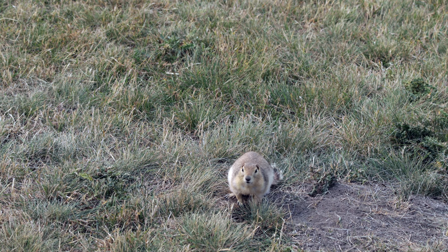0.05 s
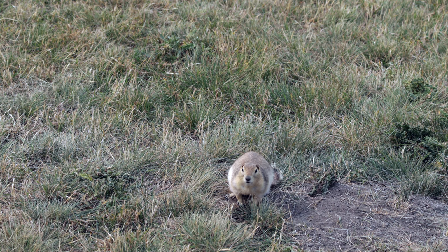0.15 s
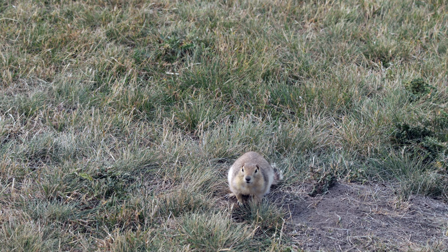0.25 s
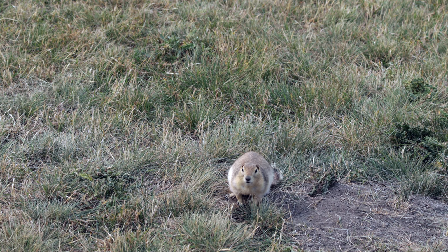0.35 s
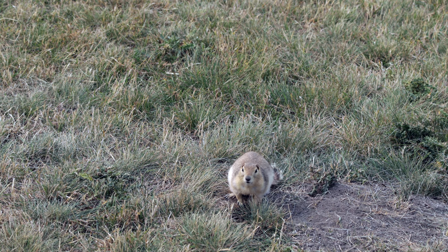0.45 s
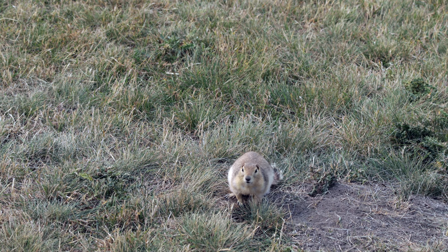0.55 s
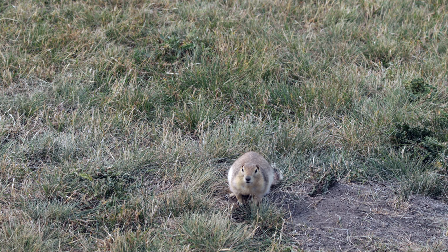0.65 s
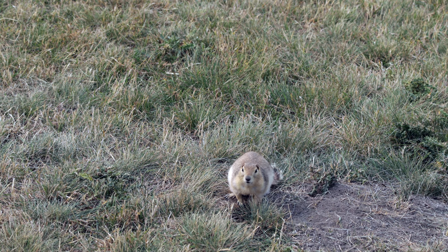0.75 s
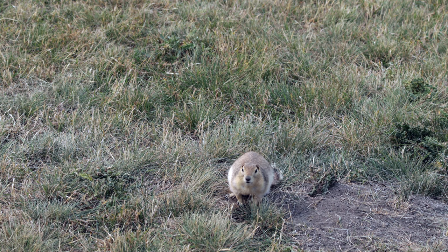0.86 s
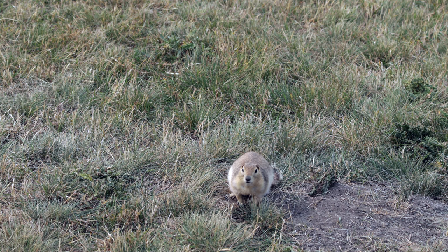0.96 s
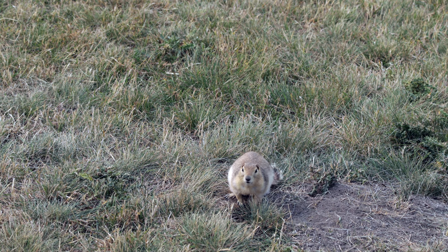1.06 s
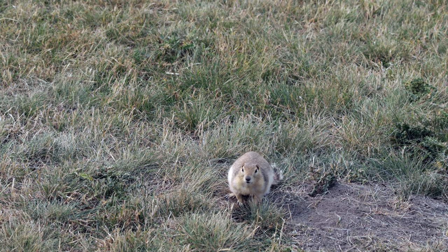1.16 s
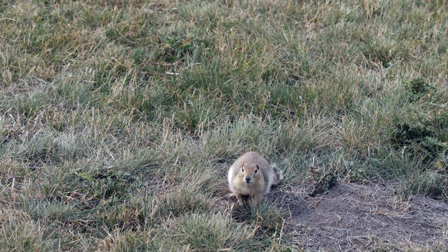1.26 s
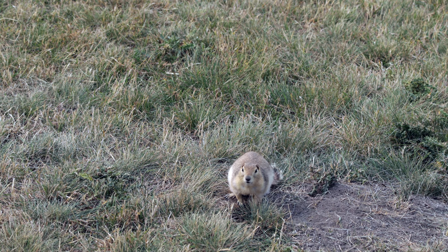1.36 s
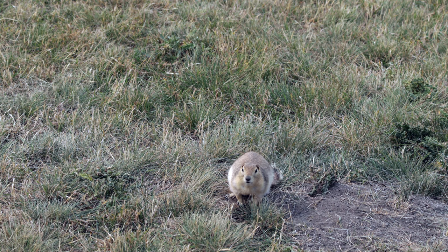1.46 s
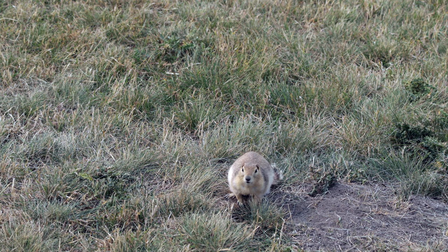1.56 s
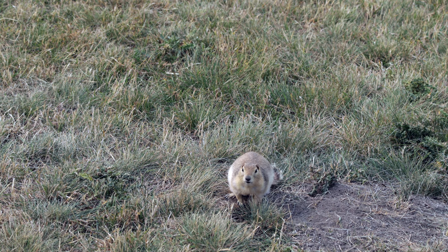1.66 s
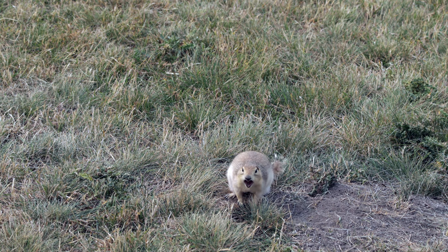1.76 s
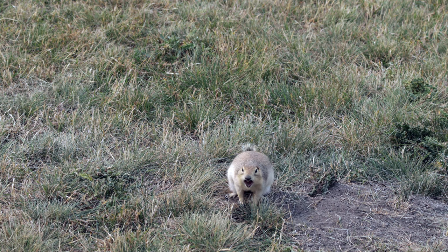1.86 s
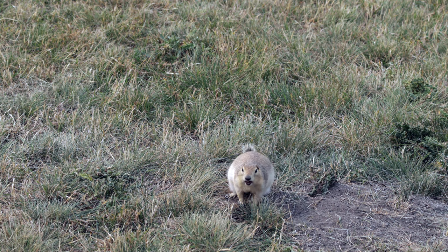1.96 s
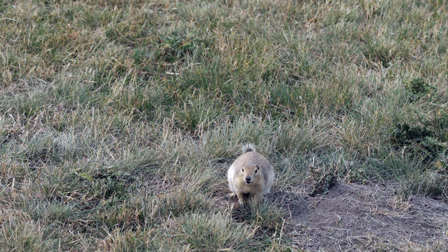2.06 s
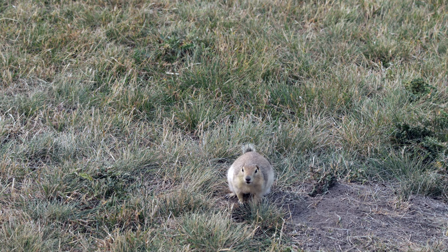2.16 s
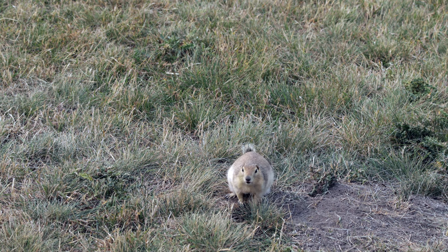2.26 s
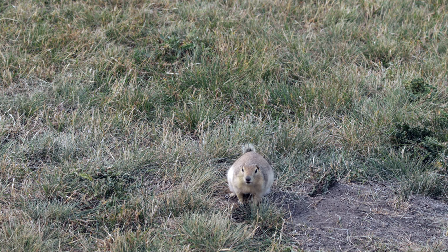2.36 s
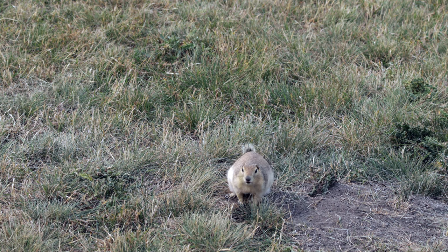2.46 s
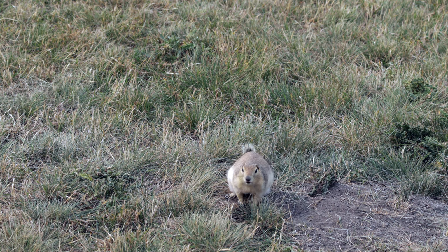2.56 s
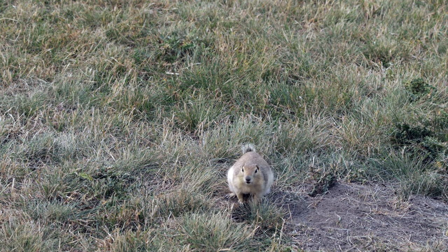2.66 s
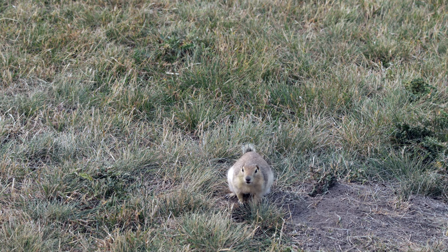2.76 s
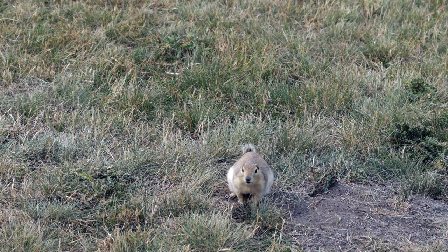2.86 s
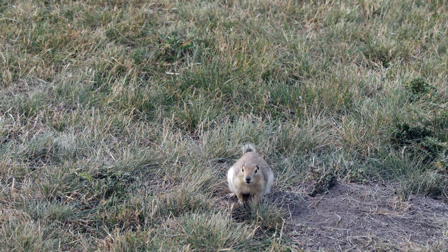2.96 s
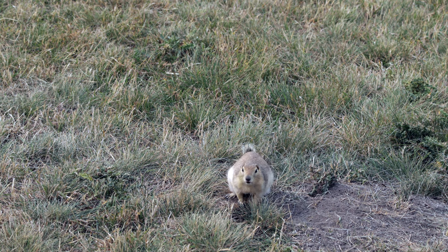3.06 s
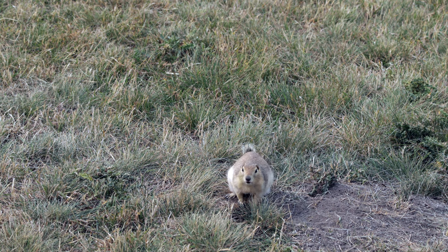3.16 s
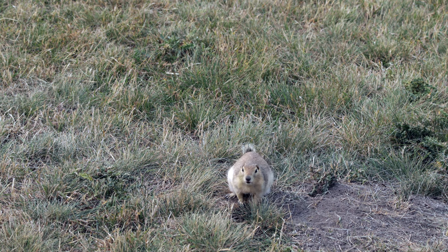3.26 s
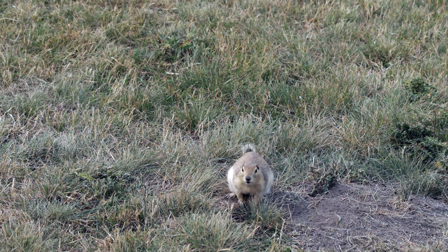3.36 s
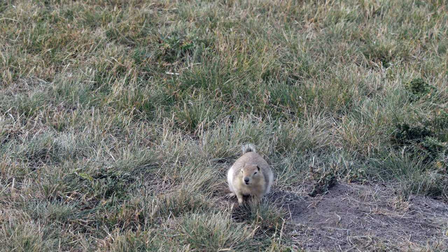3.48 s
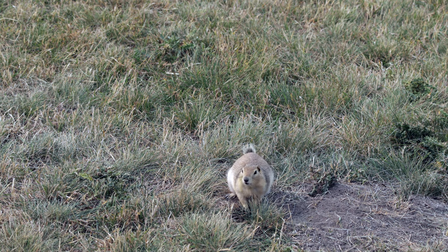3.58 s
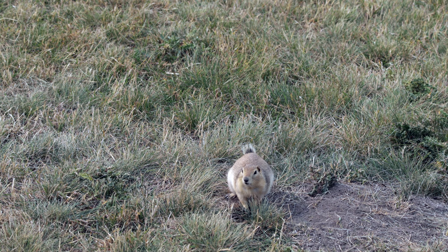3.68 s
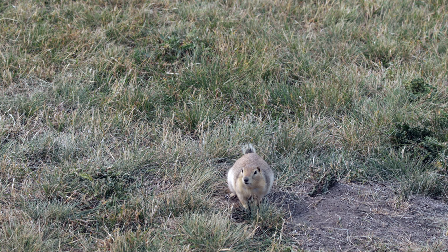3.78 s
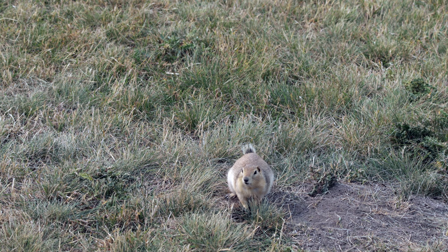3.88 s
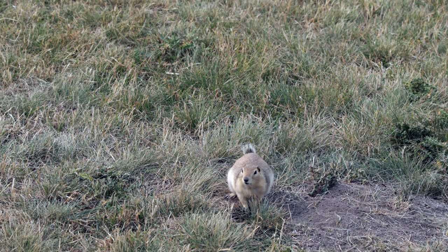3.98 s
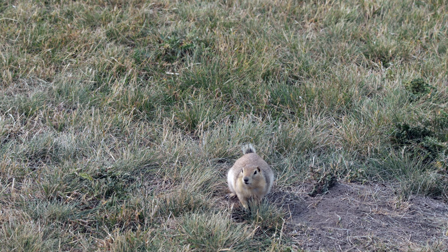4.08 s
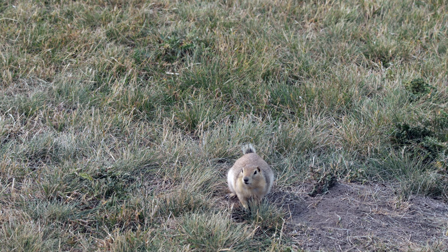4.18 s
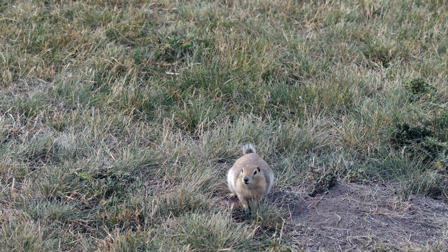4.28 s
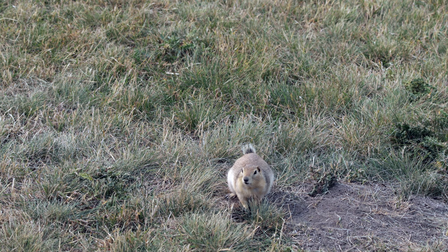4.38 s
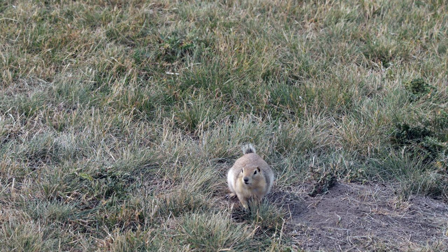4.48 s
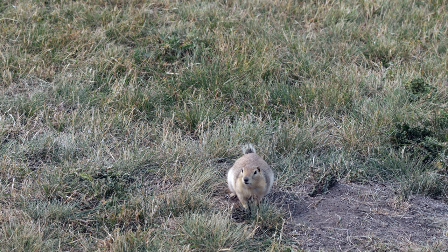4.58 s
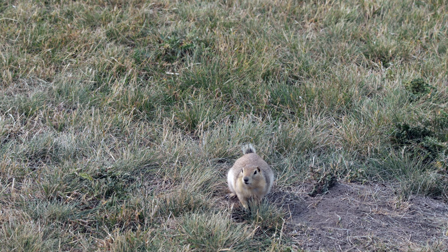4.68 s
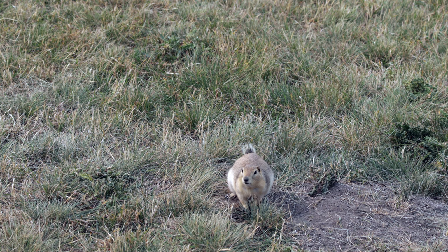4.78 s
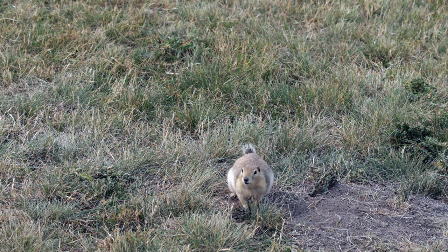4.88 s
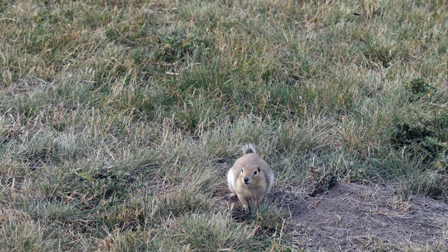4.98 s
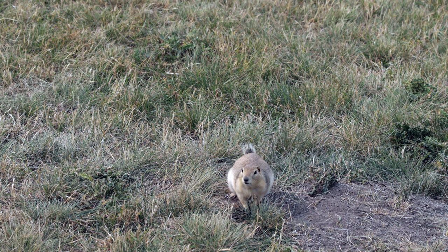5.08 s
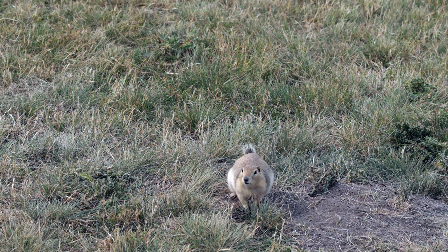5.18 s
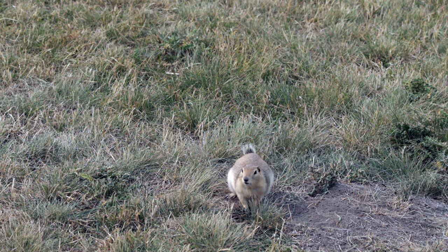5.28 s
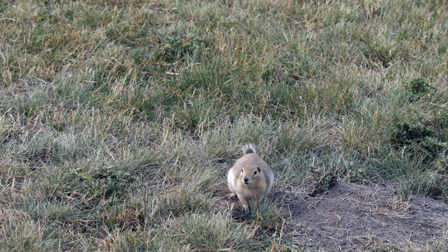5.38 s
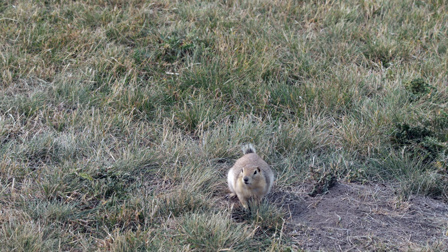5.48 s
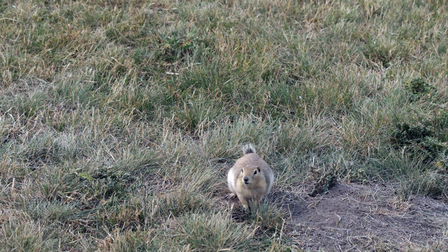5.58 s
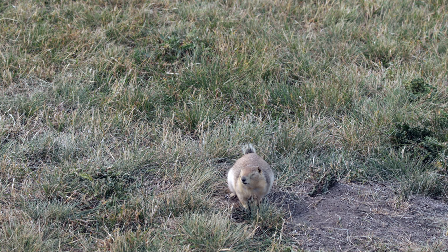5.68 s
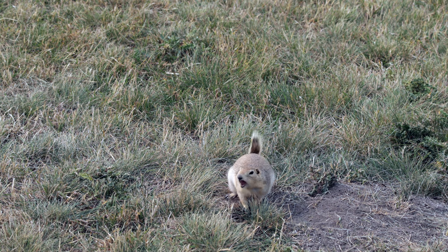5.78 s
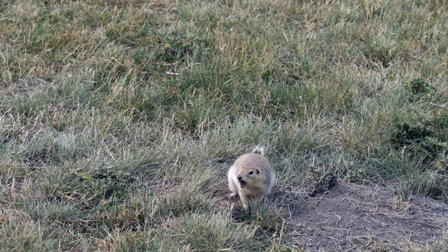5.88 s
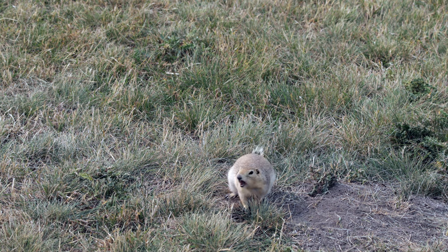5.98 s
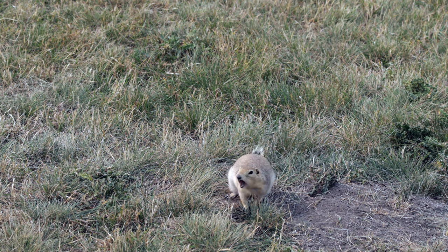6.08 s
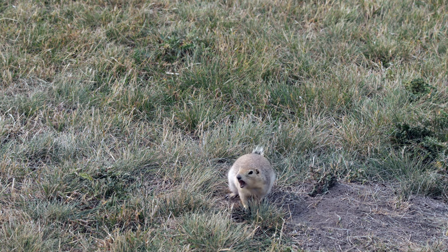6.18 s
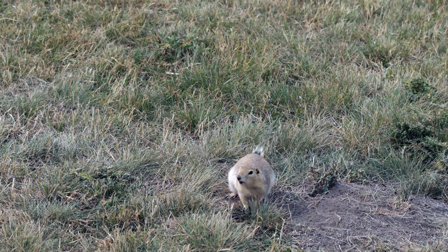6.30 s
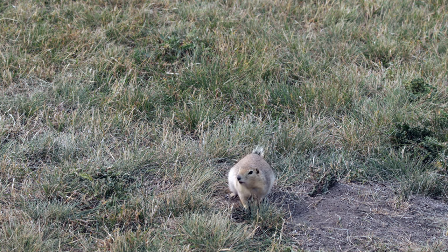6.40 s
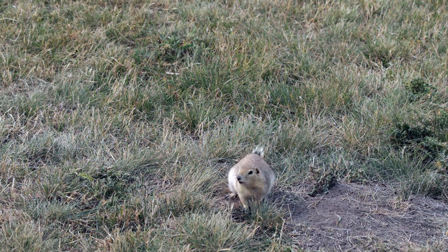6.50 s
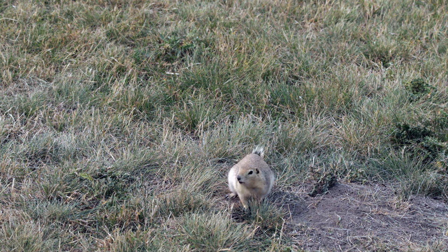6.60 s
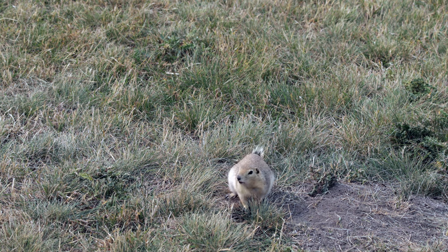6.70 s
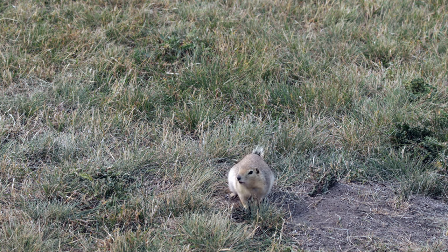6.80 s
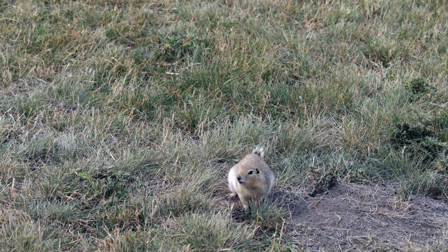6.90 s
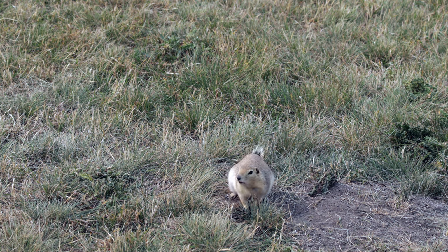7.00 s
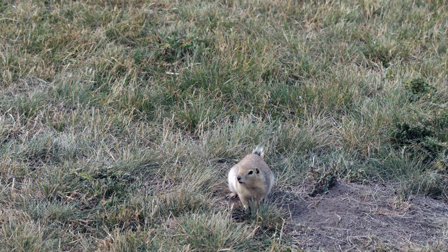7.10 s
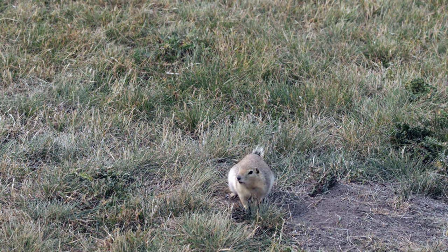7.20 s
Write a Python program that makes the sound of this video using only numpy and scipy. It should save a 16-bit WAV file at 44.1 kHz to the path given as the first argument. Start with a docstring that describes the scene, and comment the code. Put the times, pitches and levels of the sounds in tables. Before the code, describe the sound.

Steady distant traffic outdoors, faint bird chips and grass rustle, broken by two shrill, very short squirrel alarm whistles four seconds apart.

```python
"""A ground squirrel on a lawn gives two shrill alarm whistles, the second followed by a short soft note: each
is a sinking near-pure tone, and faint shaped noise surrounds it. A far bird chips in rising harmonic slurs and
fainter notes slide; a dull knock rings early on. Dry grass stirs as noise and ticks as damped snaps. Traffic
hums all along as coloured noise, with an engine drone near the end. The first whistle is so loud that a limiter
ducks the traffic for about half a second."""
import sys
import numpy as np
from scipy import signal
from scipy.fft import rfft, irfft
from scipy.io import wavfile
from scipy.ndimage import uniform_filter1d

SR = 44100
rng = np.random.default_rng(int(sys.argv[2]) if len(sys.argv) > 2 else 0)


def transcribe(signal):
    """Save signal, clipped to [-1, 1], as a 16-bit WAV file at the path in sys.argv[1]."""
    frames = np.atleast_2d(signal).T
    limited = np.clip(frames, -1, 1)
    pcm = np.round(limited * 32767).astype(np.int16)
    wavfile.write(sys.argv[1], SR, pcm)


N = 319504
TIME = np.arange(N) / SR

# Colour tables give relative density; levels are those before the limiter.
# traffic colour: pitch_hz, density_db_per_hz
TRAFFIC_COLOUR = [(15, -51), (25, -17), (39, -25), (54, -3), (106, -1), (157, -3.5), (233, -6), (311, -10),
                  (391, -14.5), (520, -14.5), (683, -11.5), (830, -9.5), (992, -10.5), (1530, -16.5),
                  (1700, -18), (2090, -24), (3500, -38.5), (4550, -60.5), (7700, -120)]
TRAFFIC_DB = -32.5
# A vehicle draws away at the start: its lift of the rumble, low and high tyre roar; time to half the lift
LEAVING_RUMBLE_DB, LEAVING_BODY_DB, LEAVING_ROAR_DB, LEAVING_S = 1, 7.0, 2.5, 1.4
# engine drone: time_s, main_line_rms_db
DRONE_LEVEL = [(5.8, -52.5), (6.05, -42.5), (6.44, -35), (6.6, -41.5), (7.24, -43)]
# lines of the engine drone: multiple_of_note, level_db
DRONE_LINES = [(1, 0), (1.2, -7)]
DRONE_HZ = 177
# faint hiss of the open air: pitch_hz, density_db_per_hz
HISS_COLOUR = [(1760, -28.5), (3000, -8.5), (3370, -12.5), (4390, -7), (5360, -9.5), (7010, -13),
               (8330, -16), (15600, -20.5)]
HISS_DB = -64
# colour of stirring grass: pitch_hz, density_db_per_hz
GRASS_COLOUR = [(1500, -19), (3000, 3), (4500, 1), (7000, -8.5), (9500, -19), (14500, -14), (16000, -25)]
# level of the rustling grass: time_s, rms_db
GRASS_LEVEL = [(0, -57), (.47, -55), (1, -60), (2.6, -62.5), (4.1, -64.5), (4.8, -73.5), (5.6, -77),
               (5.8, -59.5), (6.6, -62), (7.24, -67)]
# snaps of dry stems: start_s, envelope_peak_db, pitch_hz
STEM_SNAPS = [(1.204, -46, 11500), (1.2145, -51, 12000), (3.4625, -29, 5400), (5.796, -51, 9500)]
# a dull far knock: start_s, level_db
KNOCK_EVENT = (0.258, -22)
# what rings in the knock: pitch_hz, level_db, t60_s
KNOCK_MODES = [(993, 4.5, 0.028), (794, 0.5, 0.042), (292, -13, 0.11)]
# a low double peep and a thin squeak: start_s, length_s, first_pitch_hz, last_pitch_hz, level_db
FAR_CALLS = [(3.684, 0.019, 1720, 1680, -36), (3.708, .034, 1650, 1610, -40.5),
             (6.731, .042, 7250, 8020, -49), (6.765, .03, 8100, 6000, -61)]
# chips of a far bird: loudest_s, level_db, pitch_factor, brightness_db
CHIPS = [(2.345, -41, 1.02, -5), (2.535, -47, 1, -2), (4.148, -42, 1.01, -3), (4.345, -42, 1, -3.5),
         (4.558, -40, 1, -5), (5.797, -41, 1, -3), (5.99, -44, .99, -8), (6.212, -41.5, 1, -6),
         (6.46, -44.5, .96, -5), (6.648, -44, .97, -3), (6.697, -48, .98, -6), (6.855, -49, .97, 0)]
# resonances of the bird's throat: pitch_hz, level_db
BIRD_THROAT = [(1900, -27), (2600, 0.5), (3050, -0.5), (3600, -19.5), (4200, -12.5), (4800, -4), (5400, -6),
               (6100, -31)]
# A chip holds a low fundamental through a soft lead-in, then slurs upward through its loud part
CHIP_HZ, SLUR_HZ_PER_S, SLUR_LEAD_S = 659, 4880, 0.01303
CHIP_WIDTH_S, LEAD_IN_S, LEAD_IN_DB = .013, .038, -8.5
# the squirrel's whistles: start_s, length_s, level_db, attack_s, release_s, held_pitch_hz,
# starts_higher_by_hz, settling_time_s, quiver_depth_hz, noise_peak_rms_db
WHISTLES = [(1.8244, .142, 0.4, .021, 0.05, 8297, 800, .021, 45, -51.5),
            (5.8568, 0.12, -6, 0.032, 0.048, 8360, 623, .025, 7, -55),
            (6.152, 0.041, -16.6, .011, 0.039, 8540, 30, .008, 0, -53.5)]
QUIVER_HZ = 31.5
# colour of the noise around the whistles: pitch_hz, density_db_per_hz
NOISE_COLOUR = [(2600, -21), (4000, 6), (5400, -2), (7000, -8.5), (8000, -8), (8600, 4.5), (9400, -7),
                (12000, -19), (14300, -8.5), (15700, -15)]
# The noise around each whistle is longer than it by this margin at either end
NOISE_MARGIN_S = .028
# rasp as the short note dies: start_s, end_s, peak_rms_db
RASP_EVENT = (6.168, 6.188, -51)
# colour of that rasp: pitch_hz, density_db_per_hz
RASP_COLOUR = [(7000, -25), (9400, 3), (11000, -1), (12200, -5), (13200, -25)]
# A weak, rough undertone: pitch, level under a 0 dB whistle (softer whistles lose it faster), fading time
UNDERTONE_HZ, UNDERTONE_DB, UNDERTONE_S = 4000, -44, .045
# likeness of air noise at the two microphone ports: pitch_hz, coherence
COHERENT = [(30, .998), (80, .99), (170, .97), (320, .9), (650, .58), (1200, .46), (2400, .66), (4000, .5),
            (7000, .2), (15000, .2)]
# phase by which the left port leads: pitch_hz, lead_rad
LEFT_LEAD = [(60, 0), (340, 0.16), (600, -.5), (1120, -1.46), (2070, -2.5), (3700, -3.5), (5500, -0.8),
             (15000, -2)]
# left level over right level: pitch_hz, difference_db
LEFT_TILT = [(60, -0.5), (110, 0.0), (200, 0), (380, -0.5), (700, 0), (1290, -3.0), (2380, -2.5), (4400, 4),
             (8120, -2), (15000, 2)]
# upper edge of the sound's band
EDGE_HZ = 15780


def from_db(db):
    """Turns decibels into an amplitude factor."""
    return 10 ** (np.asarray(db) / 20)


def unit(x):
    """Scales to rms 1."""
    return x / np.sqrt(np.mean(x ** 2) + 1e-20)


def at_hz(points, hz):
    """Reads a spectrum table on a log-frequency axis."""
    f, value = np.transpose(points)
    return np.interp(np.log(hz + 1), np.log(f + 1), value)


def at_time(rows, t):
    """Reads every column of a curve table."""
    s, *columns = np.transpose(rows)
    return [np.interp(t, s, column) for column in columns]


def add(mix, s, sound):
    """Mixes a sound in at time s."""
    part = mix[max(round(s * SR), 0):][:len(sound)]
    part += sound[:len(part)]


def ramp(share):
    """Rises from 0 to 1 along a quarter sine, then holds."""
    return np.sin(np.pi / 2 * np.clip(share, 0, 1))


def waver(size, hz):
    """Smooth random motion of rms 1, mostly slower than hz."""
    f = np.fft.rfftfreq(size, 1 / SR)
    return unit(irfft(rfft(rng.standard_normal(size)) / (1 + (f / hz) ** 4), size))


def glide(hz, jitter, flutter_db):
    """A tone on a moving pitch, unsteady in pitch and level; complex, so that its phase can be shifted."""
    turns = np.cumsum(hz * (1 + jitter * waver(len(hz), 600))) / SR
    return from_db(flutter_db * waver(len(hz), 150)) * np.exp(2j * np.pi * turns)


def air_noise(spectrum, colour_db=lambda t, hz: 0):
    """Outdoor noise at both ports: alike in the bass, reaching the right port first higher up."""
    count = N // 512 + 5
    t, hz = np.arange(count)[:, None] * 512 / SR, np.fft.rfftfreq(2048, 1 / SR)
    a, b, c, d = rng.standard_normal((4, count, len(hz)))
    shared, separate = a + 1j * b, c + 1j * d
    same = np.clip(at_hz(COHERENT, hz), 0, 1)
    left = shared * np.exp(1j * at_hz(LEFT_LEAD, hz)) * from_db(at_hz(LEFT_TILT, hz))
    right = same * shared + np.sqrt(1 - same ** 2) * separate
    # the colour applies to the sum of both ports
    middle = np.sqrt(np.mean(abs(left + right) ** 2, axis=0))
    z = np.array([left, right]) / middle * from_db(at_hz(spectrum, hz) + colour_db(t, hz))
    x = signal.istft(z, nperseg=2048, noverlap=1536, time_axis=1, freq_axis=2)[1][:, :N]
    return x / x.mean(0).std()


def scatter(x, wet_db, t60):
    """The lawn and far things throw back a thin, quickly dying tail, different at each port."""
    t = np.arange(SR) / SR
    sparse = rng.standard_normal((2, SR)) * (rng.random((2, SR)) < 1 / 16)
    taps = sparse * (t > .006) * from_db(-60 * t / t60)
    taps /= np.linalg.norm(taps, axis=1, keepdims=True)
    return from_db(wet_db) * signal.fftconvolve(x[None], taps, axes=1)[:, :N]


def traffic(body_hz=340, body_octaves=0.57, roar_hz=520):
    """Steady engine rumble and tyre roar, lifted at first by one vehicle that draws away."""
    def swell_db(t, hz):
        """The vehicle's fading lift, shared between rumble, low roar and high roar."""
        near = 1 / (1 + (t / LEAVING_S) ** 3)
        high = hz ** 2 / (hz ** 2 + roar_hz ** 2)
        body = np.exp(-.5 * (np.log2((hz + 1) / body_hz) / body_octaves) ** 2)
        outside_db = (1 - high) * LEAVING_RUMBLE_DB + high * LEAVING_ROAR_DB
        return near * (body * LEAVING_BODY_DB + (1 - body) * outside_db)
    return from_db(TRAFFIC_DB) * air_noise(TRAFFIC_COLOUR, swell_db)


def engine():
    """Two neighbouring orders of one far engine rise out of the traffic, wavering in the moving air."""
    db = at_time(DRONE_LEVEL, TIME)[0]
    turns = np.cumsum(DRONE_HZ + 2 * waver(N, 8)) / SR
    lines = [from_db(db + line_db + waver(N, 6)) * np.sin(2 * np.pi * multiple * turns)
             for multiple, line_db in DRONE_LINES]
    return np.sqrt(2) * sum(lines)  # from rms to peak


def grass(snap_s=.00007):
    """An uneven noise rustle over the steady air hiss, and a few stems that snap as brief damped tones."""
    rustle_db = at_time(GRASS_LEVEL, TIME)[0] + 1.3 * waver(N, 25)
    rustle = from_db(rustle_db) * air_noise(GRASS_COLOUR)
    t, snaps = np.arange(0, .004, 1 / SR), np.zeros(N)
    envelope = (t / snap_s) * np.exp(1 - t / snap_s)
    for s, db, hz in STEM_SNAPS:
        add(snaps, s, from_db(db) * envelope * np.sin(2 * np.pi * hz * t))
    return rustle + snaps + from_db(HISS_DB) * air_noise(HISS_COLOUR)


def knock():
    """A short dull blow of three damped modes, half lost in its own echoes."""
    t, blow = np.arange(0, .2, 1 / SR), np.zeros(N)
    start, level_db = KNOCK_EVENT
    ring = sum(from_db(db - 60 * t / t60) * np.sin(2 * np.pi * hz * t) for hz, db, t60 in KNOCK_MODES)
    onset = 1 - np.exp(-t / 0.00045)
    add(blow, start, -from_db(level_db) * ring * onset)
    return blow + scatter(blow, wet_db=1, t60=0.24)


def far_calls():
    """Faint notes from across the lawn that swell, slide to their last pitch and fade, unsteady and echoing."""
    voice = np.zeros(N, complex)
    for start, length, first_hz, last_hz, db in FAR_CALLS:
        share = np.arange(0, length, 1 / SR) / length
        tone = glide(first_hz + (last_hz - first_hz) * ramp(share), jitter=.011, flutter_db=5.5)
        add(voice, start, from_db(db) * np.sin(np.pi * share) * tone)
    return voice.real + scatter(voice.real, wet_db=-5, t60=.3)


def bird(right_db=-8, overtone_hz=3800):
    """Each chip is a nasal upward slur through two throat resonances: clear below, raspy above, to the left."""
    t = np.arange(-.07, .03, 1 / SR)  # 0 is the peak of the chip's envelope
    pitch = CHIP_HZ + SLUR_HZ_PER_S * np.maximum(t + SLUR_LEAD_S, 0)
    lead_in = from_db(LEAD_IN_DB) * np.exp(-((t + LEAD_IN_S) / CHIP_WIDTH_S) ** 2)
    shape = np.exp(-(t / CHIP_WIDTH_S) ** 2) + lead_in
    song = np.zeros(N)
    for loudest_s, db, factor, bright_db in CHIPS:
        hz = factor * pitch * (1 + .014 * waver(len(t), 200))
        for k in range(3, 9):  # only these harmonics sound
            upper = 1 / (1 + (overtone_hz / (k * hz)) ** 12)
            rasp = 1.2 * upper * waver(len(t), 350)  # radians
            partial = np.sin(2 * np.pi * k * np.cumsum(hz) / SR + rasp)
            partial_db = db + at_hz(BIRD_THROAT, k * hz) + upper * bright_db
            add(song, loudest_s + t[0], shape * from_db(partial_db) * partial)
    echo = scatter(song, wet_db=-9, t60=.25)
    return np.array([song, from_db(right_db) * song]) + echo


def squirrel(right_db=-4.0, right_lead=.65):
    """Whistles with faint noise around them start high and sink to a held pitch; the two alarms quiver."""
    voice, noise, rasp = np.zeros(N, complex), np.zeros(N), np.zeros(N)
    for start, length, db, attack, release, held_hz, high_hz, settle, quiver_hz, noise_db in WHISTLES:
        t = np.arange(0, length, 1 / SR)
        quiver = quiver_hz * np.sin(2 * np.pi * QUIVER_HZ * t)
        hz = held_hz + high_hz * np.exp(-t / settle) + quiver
        tone = ramp(t / attack) * glide(hz, jitter=.0004, flutter_db=.1)
        rough = glide(np.full(len(t), UNDERTONE_HZ), jitter=.025, flutter_db=3)
        under = from_db(UNDERTONE_DB + db) * np.exp(-t / UNDERTONE_S) * rough
        soft_ends = ramp(np.minimum(t, length - t) / .004) ** 2
        add(voice, start, from_db(db) * soft_ends * ramp((length - t) / release) * (tone + under))
        noise_shape = signal.windows.tukey(round((length + 2 * NOISE_MARGIN_S) * SR), .45)
        add(noise, start - NOISE_MARGIN_S, from_db(noise_db) * noise_shape)
    rasp_start, rasp_end, rasp_db = RASP_EVENT
    rasp_shape = np.hanning(max(round((rasp_end - rasp_start) * SR), 1))
    add(rasp, rasp_start, from_db(rasp_db) * rasp_shape)
    # the right port hears it softer, its phase ahead by right_lead radians
    ports = np.array([voice, voice * from_db(right_db) * np.exp(1j * right_lead)]).real
    shaped_noise = noise * air_noise(NOISE_COLOUR) + rasp * air_noise(RASP_COLOUR)
    return ports + shaped_noise + scatter(voice.real, wet_db=-36.5, t60=0.51)


def scene():
    """Layers the lawn from the distant traffic to the squirrel."""
    return traffic() + engine() + grass() + knock() + far_calls() + bird() + squirrel()


def record(dry, ceiling_db=-6.0, recovery_db_per_s=15):
    """A limiter drops the gain within milliseconds and lets it creep back; then the band limit."""
    power = abs(uniform_filter1d(dry ** 2, size=128, axis=1)).max(0)
    peak_db = 10 * np.log10(2 * power + 1e-12)  # peak of a sine with this power
    creep = TIME * recovery_db_per_s
    held_db = np.maximum.accumulate(peak_db + creep) - creep
    over_db = np.maximum(held_db - ceiling_db, 0)
    limited = dry * from_db(-uniform_filter1d(over_db, size=128))
    low_pass = signal.firwin(511, EDGE_HZ, window=("kaiser", 9), fs=SR)
    return signal.oaconvolve(limited, low_pass[None], "same", axes=1)


dry = scene()
out = record(dry)
transcribe(out)
```